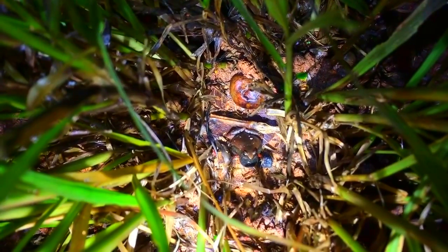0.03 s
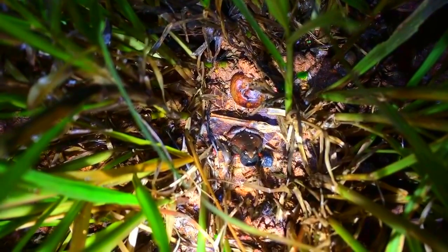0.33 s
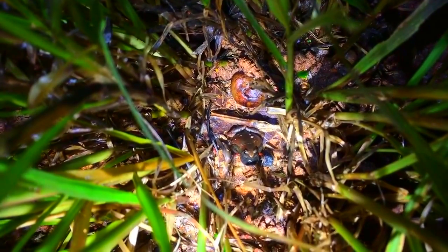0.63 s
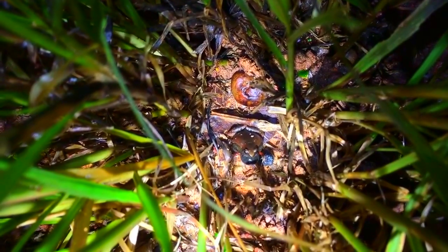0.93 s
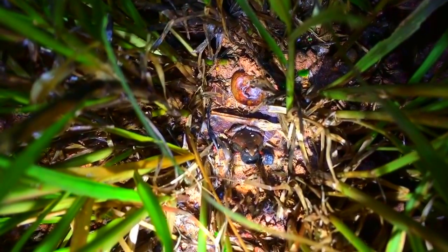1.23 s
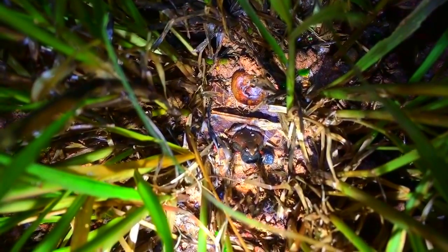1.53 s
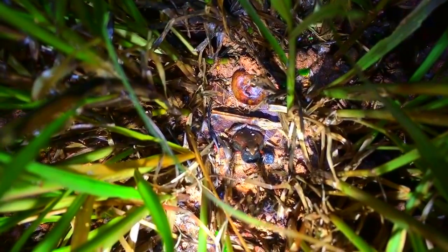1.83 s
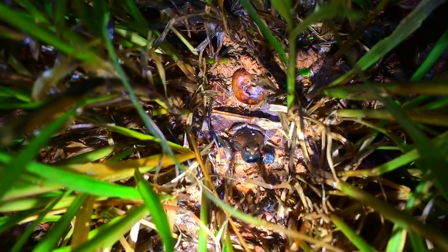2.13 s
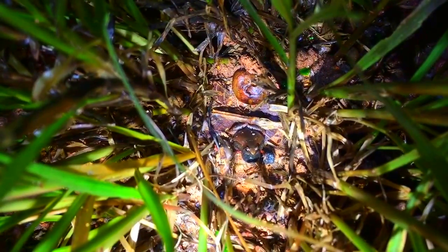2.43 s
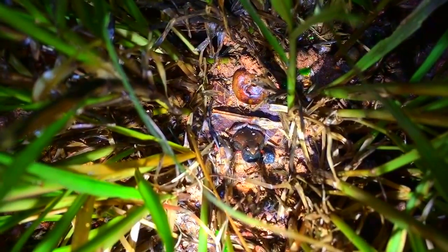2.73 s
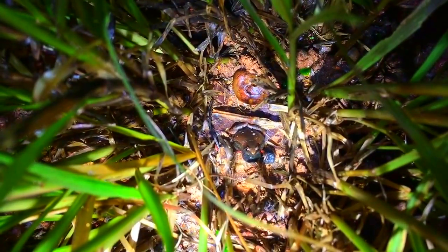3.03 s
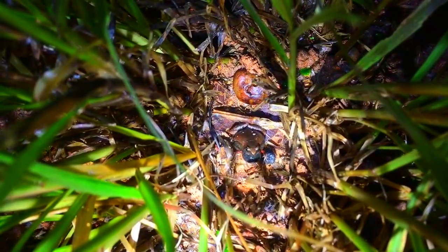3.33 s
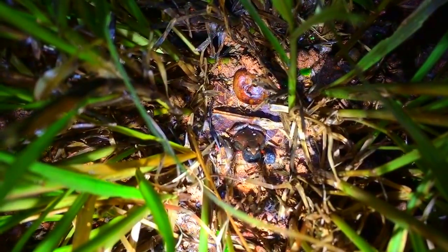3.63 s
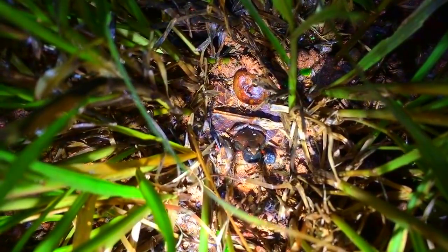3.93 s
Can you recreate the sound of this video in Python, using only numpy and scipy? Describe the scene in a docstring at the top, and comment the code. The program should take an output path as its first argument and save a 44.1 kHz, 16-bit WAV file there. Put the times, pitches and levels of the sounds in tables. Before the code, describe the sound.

A small frog close by gives two short rasping runs of clicks, at about 0.1 and 2.5 seconds, each brightening towards its end. Another frog buzzes briefly at the start and again from 3.2 to 4 seconds. A farther one trills from 1.5 to 2.4 seconds. Throughout, distant frogs rasp and buzz in chorus over faint high insect hiss, a few grass ticks and a low, far engine hum.

```python
"""Night in wet grass. A nearby frog buzzes briefly, then a small narrow-mouthed frog close by gives a
rasping call: a run of clicks that ring its throat, low at first and higher towards the end. At 1.5 s
a trill comes from further off, at 2.5 s the close frog rasps again, and from 3.2 s the buzzing returns.
All along, other rasping frogs answer from afar and a distant chorus buzzes, over insect hiss,
a few ticks in the grass, the hum of a far engine and the night air."""
import sys
import numpy as np
from scipy import signal
from scipy.fft import rfft, irfft
from scipy.io import wavfile
from scipy.ndimage import uniform_filter1d, minimum_filter1d

SR = 44100
rng = np.random.default_rng(int(sys.argv[2]) if len(sys.argv) > 2 else 0)


def to_wav(sig):
    """Store sig (one row per channel, or 1-D mono) as 16-bit WAV at the path in sys.argv[1].

    Samples outside -1..1 are clipped; the rate is SR.
    """
    pcm = np.clip(np.atleast_2d(sig), -1, 1) * 32767
    pcm = np.round(pcm).astype(np.int16)
    wavfile.write(sys.argv[1], SR, pcm.T)  # frames by channels


N = 176400
TIME = np.arange(N) / SR
SIZE = 4096  # samples set aside for one short sound or echo


# The close frog's clicks, one list per call. Each row: start in seconds, relative level in dB.
NEAR_CALLS = [
    [(.1325, -22.5), (.1582, -1), (.19039, 0), (.21941, 4.5), (.24841, 1.5), (.2771, 2), (.30519, 4),
     (.3334, 0), (.35914, 0), (.38558, -1.5), (.40658, -5)],
    [(2.5405, -21), (2.5693, 0), (2.5976, 2), (2.62739, 4.5), (2.65696, 2), (2.68549, 5.5), (2.71281, 2),
     (2.74122, 3.5), (2.76846, 2.5), (2.79322, 0), (2.81871, -3.5), (2.83068, -11)],
]
# How well each pitch carries to the listener. Each row: frequency in Hz, gain in dB.
PATH_TO_LISTENER = [(200, -20.5), (600, -5), (850, -3.5), (1200, -1.5), (3000, 0), (6000, 0.5), (6800, -4),
                    (8500, -6), (11500, -8), (14000, -4), (16000, -7)]
# The treble that the stems throw back. Each row: frequency in Hz, gain in dB.
STEM_REFLECTION = [(2500, -40), (4500, -13), (6000, -11), (9000, -2.5), (14000, -2.5)]

def near_frog(level_db=3.5, treble_lag_s=0.00063, treble_from_hz=2200):
    """Two runs of throat clicks; each click chirps upwards as its highs come late. Grass scatters it."""
    calls = np.zeros(N)
    for call in NEAR_CALLS:
        first, last = call[0][0], call[-1][0]
        for start, db in call:
            progress = (start - first) / (last - first)
            add(calls, start, amp(level_db + db) * throat_click(progress))
    hz = np.arange(N // 2 + 1) * SR / N
    lag_s = treble_lag_s * hz ** 4 / (hz ** 4 + treble_from_hz ** 4)
    delay_treble = np.exp(-2j * np.pi * np.cumsum(lag_s) * SR / N)
    direct = colour(irfft(rfft(calls) * delay_treble, N), PATH_TO_LISTENER)
    sparkle = through(colour(direct, STEM_REFLECTION), grass_echo(fade_s=0.021))
    return direct + sparkle + amp(-18.5) * through(direct, grass_echo(fade_s=0.048))


# The pitches at which the close frog's throat rings. Each row: frequency in Hz, width in Hz,
# relative level in dB at the start of a call, and at its end.
THROAT_RESONANCES = [(1292, 117, 31, 13), (1550, 227, 21, 11), (1930, 240, 18.5, 9), (2075, 73, 17.5, 9.5),
                     (2300, 157, 20, 18.5), (2420, 200, 22, 15), (4460, 160, 3.5, 10.5),
                     (5430, 310, -2.5, 0), (5970, 290, -5, -4), (7200, 600, -38, -13),
                     (10000, 3000, -33, -31), (14200, 1100, -23, -15)]

def throat_click(progress):
    """One click rings the throat. As progress goes from 0 to 1, a low ring gives way to a high one."""
    climbing_hz = 2630 + (2862 - 2630) * progress
    climbing_db = 21 + (27.7 - 21) * progress
    resonances = [(climbing_hz, 252, climbing_db)]
    for hz, width, start_db, end_db in THROAT_RESONANCES:
        resonances.append((hz, width, start_db + (end_db - start_db) * progress))
    return ring(resonances, steepness=1.65, bass_cut_hz=933)


# The nearby buzzes, one list each. Each row: time in seconds, clicks per second, relative level in dB.
BUZZ_CALLS = [
    [(.0035, 109.1, -1), (.015, 109, .5), (.07, 105.6, -1.5), (.09, 124.4, -2.5), (.125, 131, -13)],
    [(3.2218, 109.9, -10), (3.25, 110.1, -4), (3.33, 116.1, -4.5), (3.43, 120.2, -2), (3.53, 122.4, -1.5),
     (3.62, 120, -1.5), (3.69, 125.1, -.5), (3.76, 117.9, -.3), (3.85, 115.7, -.3), (4.0, 110.3, -.5)],
]
# The tones in one buzz click. Each row: frequency in Hz, half length in seconds, relative level in dB.
BUZZ_TONES = [(3472, 0.00037, -9.5), (2754, 0.00053, -29.5), (1900, 0.00032, -44), (6310, 0.00032, -36.5),
              (8640, 0.00011, -47.5)]
# The ring after each click. Each row: frequency in Hz, width in Hz, relative level in dB.
BUZZ_RESONANCES = [(2880, 230, 2), (3220, 150, 8), (3613, 180, 11), (6600, 700, -16)]

def buzzing_frog(peak_s=0.00115, ring_lag_s=0.0027):
    """A second kind of frog: fast, sharp bursts of tone, each followed by a weaker, longer ring."""
    train = amp(-0.5) * sum(clicks(rows, spread_db=0.9) for rows in BUZZ_CALLS)
    t = TIME[:SIZE] - peak_s
    burst = 0
    for hz, half_length, db in BUZZ_TONES:
        swell = np.exp(-(t / half_length) ** 2 / 2)
        burst = burst + amp(db) * swell * np.cos(2 * np.pi * hz * t)
    out = through(train, burst)
    uneven_train = train * amp(-1 + 2 * wander(140))
    after_ring = through(uneven_train, ring(BUZZ_RESONANCES, steepness=2.2, bass_cut_hz=2330))
    add(out, ring_lag_s, after_ring)
    return out


# The course of the trill. Each row: time in seconds, clicks per second, relative level in dB.
TRILL_CALL = [(1.5, 160, -20), (1.62, 117, -5.5), (1.9, 118, -1.5), (2.15, 106, -1), (2.35, 111, 2),
              (2.42, 107, -2.5), (2.44, 104, -18)]
# The pitches its clicks ring at. Each row: frequency in Hz, width in Hz, relative level in dB.
TRILL_RESONANCES = [(3670, 250, 9.4), (3910, 293, 14.2)]

def trilling_frog():
    """A frog at middle distance: fast clicks ring at a higher pitch, blurred by their echoes."""
    train = amp(0.5) * clicks(TRILL_CALL, spread_db=0.5)
    direct = through(train, ring(TRILL_RESONANCES, steepness=4.4, bass_cut_hz=2200))
    return direct + amp(-9.5) * through(direct, grass_echo(fade_s=0.037))


# The far rasps. Each row: start in seconds, length in seconds, clicks per second, relative level in dB.
FAR_CALLS = [(0.007, 0.14, 30, -23), (0.608, 0.19, 35, -34.5), (.97, 0.44, 38, -30.5),
             (1.282, .21, 31.7, -21.5), (1.753, .3, 27, -32.5), (2.307, .22, 35, -29.5),
             (3.175, 0.22, 43, -27.5), (3.567, 0.29, 30, -27)]
# The pitches at which far throats ring. Each row: frequency in Hz, width in Hz, relative level in dB.
FAR_RESONANCES = [(1310, 150, 23), (1530, 220, 20), (1950, 300, 19.5), (2670, 480, 24.5)]

def far_frogs():
    """Frogs of the close one's kind rasp from afar; each call swells and fades, smeared by the grass."""
    calls = 0
    for start, length, rate, db in FAR_CALLS:
        swell = [(start, rate, db - 3), (start + .3 * length, rate, db), (start + length, rate, db - 5)]
        train = clicks(swell, spread_db=1.8)
        calls = calls + train + amp(-6) * through(train, grass_echo(fade_s=0.076))
    return through(calls, ring(FAR_RESONANCES, steepness=2.2, bass_cut_hz=1150))


# How loud the distant chorus is. Each row: time in seconds, level in dB.
CHORUS_LEVELS = [(0, -28.5), (.25, -29), (.44, -29), (.66, -25.5), (.9, -28.5), (1.05, -31.5), (1.25, -34),
                 (1.42, -30), (1.6, -26.5), (1.9, -25), (2.1, -26), (2.3, -28), (2.55, -30), (2.88, -35.5),
                 (3.05, -28), (3.25, -27), (3.5, -28), (4, -29)]
# The tone of the chorus. Each row: frequency in Hz, relative level in dB.
CHORUS_TONE = [(1060, -77), (1800, -48), (2260, -26), (2610, -10), (2810, -8), (3000, -6), (3220, -5),
               (3580, 1.5), (3960, -5.5), (4260, -16.5), (5060, -32.5), (5840, -35.5), (6990, -32.5),
               (8790, -47), (10000, -49), (13000, -77), (22000, -120)]

def frog_chorus(frogs=9, clicks_per_s=114):
    """Many far frogs buzz, each clicking at its own wavering rate, and all swell together."""
    voices = 0
    for _ in range(frogs):
        rate = clicks_per_s * (1 + .05 * rng.standard_normal() + .03 * wander(6))
        train = np.diff(np.floor(np.cumsum(rate) / SR), prepend=0)
        waver_db = 1.34 * wander(90) + 0.9 * wander(3.22)
        voices = voices + through(train * amp(waver_db), grass_echo(fade_s=0.05))
    return unit(colour(voices, CHORUS_TONE)) * amp(curve(CHORUS_LEVELS))


# Ticks and drips in the grass. Each row: start in seconds, centre frequency in Hz, width in Hz,
# seconds to fade by 60 dB, starting level in dB.
GRASS_TICKS = [(1.175, 10100, 2200, 0.012, -38), (1.304, 12000, 6000, .04, -56),
               (1.377, 11500, 4000, .02, -52), (1.719, 11300, 6000, 0.013, -48),
               (3.038, 11500, 6000, .015, -40), (3.037, 650, 1300, 0.04, -43), (3.04, 150, 70, 0.076, -36),
               (3.259, 11000, 6000, .02, -50), (3.652, 750, 350, 0.025, -40)]

def grass_ticks():
    """Stems and drops make short bursts of noise that die away fast."""
    out = np.zeros(N)
    for start, hz, width, fade_s, db in GRASS_TICKS:
        band = ring([(hz, width, 0)], steepness=1.4, bass_cut_hz=80)
        noise = unit(through(rng.standard_normal(N), band))[-SIZE:]
        add(out, start, noise * amp(db - 60 * TIME[:SIZE] / fade_s))
    return out


# How loud the insects are. Each row: time in seconds, level in dB.
INSECT_LEVELS = [(0, -66), (.65, -59), (1.1, -70), (1.5, -64.5), (2.05, -57.5), (2.4, -66), (2.9, -67),
                 (3.5, -64), (4, -61)]

def insects(centre_hz=14600, width_hz=1700):
    """Insects make a very high, flickering hiss that swells and sinks."""
    band = ring([(centre_hz, width_hz, 0)], steepness=0.99, bass_cut_hz=9000)
    hiss = unit(through(rng.standard_normal(N), band))
    return hiss * amp(curve(INSECT_LEVELS) + 1.2 * wander(60))


# The tones in the engine's hum. Each row: multiple of the shaft's turning rate, level in dB.
ENGINE_TONES = [(3, -61), (4, -34), (5, -49), (6, -63), (7, -54), (8, -49), (11, -53), (12, -58.5),
                (14, -64.5)]

def far_engine(turns_per_s=12.95, waver_db=0.5):
    """A turning shaft makes a low, throbbing hum on multiples of its rate."""
    angle = 2 * np.pi * np.cumsum(turns_per_s * (1 + 0.0019 * wander(2.4))) / SR
    return sum(np.sqrt(2) * amp(db + waver_db * wander(3.2)) * np.sin(multiple * angle)
               for multiple, db in ENGINE_TONES)


# The tone of the night air. Each row: frequency in Hz, relative level in dB.
AIR_TONE = [(25, -38), (60, -6.5), (120, -17.5), (200, -18.5), (300, -31.5), (450, -40), (800, -41),
            (1050, -36), (1300, -27), (1600, -34.5), (2200, -25.5), (5000, -44), (11000, -54.5),
            (16000, -51.5)]

def night_air():
    """A soft, steady rush of noise, strongest in the bass."""
    return amp(-12) * colour(rng.standard_normal(N), AIR_TONE)


def grass_echo(fade_s):
    """Stems and ground scatter a click into a smooth tail that falls by 60 dB in fade_s seconds."""
    t = TIME[:SIZE]
    build_up = 1 - np.exp(-t / .002)
    tail = rng.standard_normal(SIZE) * amp(-60 * t / fade_s) * build_up
    return tail / np.sqrt(np.sum(tail ** 2))


def clicks(rows, spread_db, jitter_s=0.00002):
    """A run of slightly uneven clicks that follows rows of (seconds, clicks per second, dB)."""
    calling = (TIME >= rows[0][0]) & (TIME <= rows[-1][0])
    clicks_so_far = np.ceil(np.cumsum(curve(rows) * calling) / SR)
    due = np.flatnonzero(np.diff(clicks_so_far, prepend=0))
    louder, later = rng.standard_normal((SIZE, 2))[:len(due)].T
    played = np.clip(due + np.round(jitter_s * SR * later).astype(int), 0, N - 1)
    out = np.zeros(N)
    out[played] = amp(curve(rows, column=2)[due] + spread_db * louder)
    return out


def ring(resonances, steepness, bass_cut_hz):
    """How a body with (Hz, width in Hz, dB) resonances rings after one click, giving off little bass."""
    freqs = np.arange(SIZE // 2 + 1) * SR / SIZE
    power = sum(amp(db) ** 2 / (1 + (2 * (freqs - hz) / width) ** 2 / steepness) ** steepness
                for hz, width, db in resonances)
    power = power / (1 + (bass_cut_hz / (freqs + 1)) ** 8) + 1e-6
    # Turn these strengths into a sound that starts at once and then dies away (minimum phase).
    cepstrum = irfft(np.log(power) / 2)
    one_sided = np.r_[cepstrum[0], 2 * cepstrum[1:SIZE // 2]]
    return irfft(np.exp(rfft(one_sided, SIZE)))[:SIZE // 2]


def wander(rate):
    """A smooth random wobble of typical size 1 that changes about rate times a second."""
    hold = int(SR / rate)
    steps = np.repeat(rng.standard_normal(N // hold + 1), hold)
    return unit(uniform_filter1d(uniform_filter1d(steps, hold), hold)[:N])


def colour(x, points):
    """Make some pitches louder and others softer, following (Hz, dB) points."""
    hz, db = np.array(points).T
    freqs = np.arange(N // 2 + 1) * SR / N
    gain_db = np.interp(np.log(freqs + 1), np.log(hz), db)
    return irfft(rfft(x) * amp(gain_db), N)


def curve(rows, column=1):
    """Join one column's values with straight lines over time."""
    rows = np.array(rows)
    return np.interp(TIME, rows[:, 0], rows[:, column])


def through(x, response):
    """Give every sample of a sound the same ring or echo."""
    return signal.fftconvolve(x, response)[:N]


def add(out, start, sound):
    """Mix a sound in at a time in seconds."""
    i = int(np.clip(start * SR, 0, N - 1))
    out[i:i + len(sound)] += sound[:N - i]


def amp(db):
    """Turn decibels into a multiplier."""
    return 10 ** (np.asarray(db) / 20)


def unit(x):
    """Scale to an average strength (rms) of 1."""
    return x / np.sqrt(np.mean(x ** 2))


def scene():
    """All the frogs and their background, in one channel."""
    air = night_air()
    frogs = near_frog() + far_frogs() + buzzing_frog() + trilling_frog() + frog_chorus()
    return (frogs + insects() + far_engine() + grass_ticks() + air)[None]


def record(dry, limit=0.73, top_hz=15850):
    """A fast limiter holds the loudest clicks down, then the highest treble is cut."""
    needed_gain = np.minimum(1, limit / (np.abs(dry) + 1e-9))
    held_gain = minimum_filter1d(needed_gain, size=177)
    smooth_gain = uniform_filter1d(uniform_filter1d(held_gain, size=89), size=89)
    treble_cut = signal.ellip(10, .2, 80, top_hz, fs=SR, output="sos")
    return signal.sosfilt(treble_cut, dry * smooth_gain)


dry = scene()
out = record(dry)
to_wav(out)
```